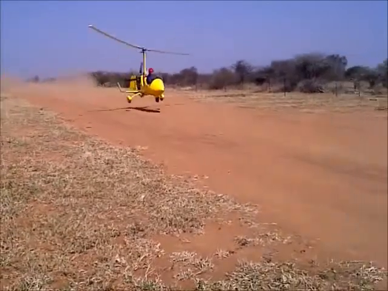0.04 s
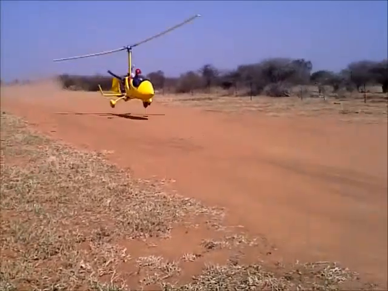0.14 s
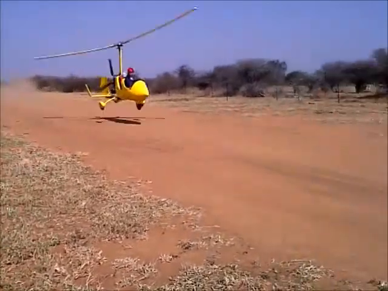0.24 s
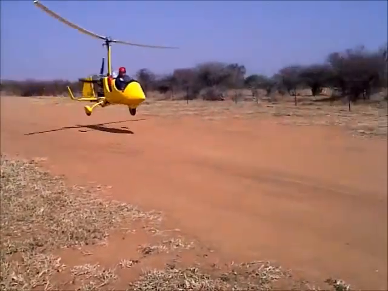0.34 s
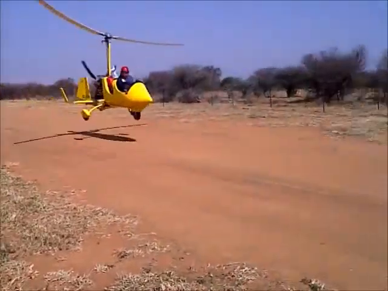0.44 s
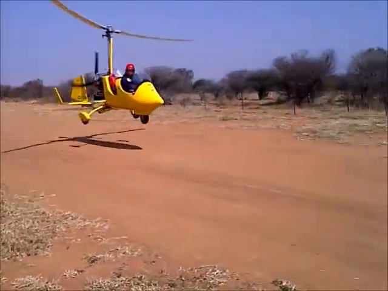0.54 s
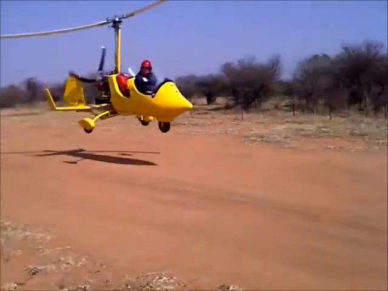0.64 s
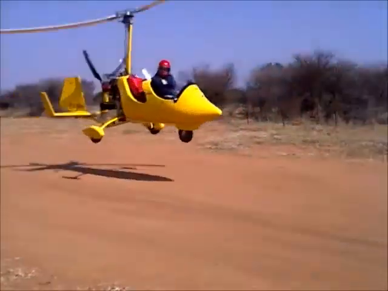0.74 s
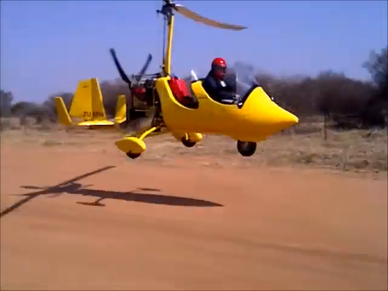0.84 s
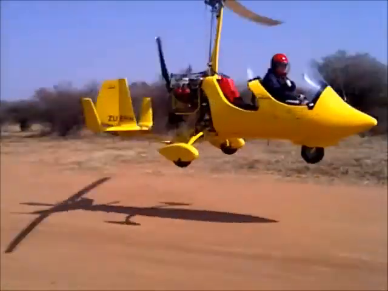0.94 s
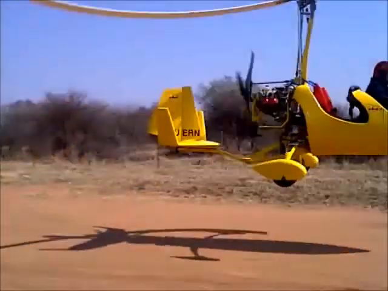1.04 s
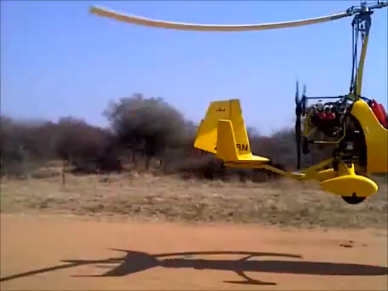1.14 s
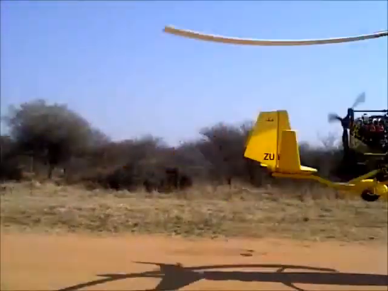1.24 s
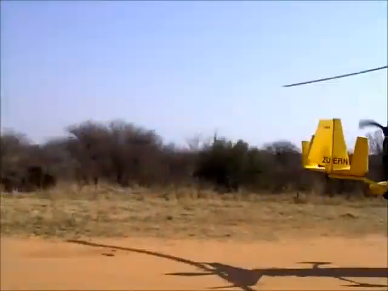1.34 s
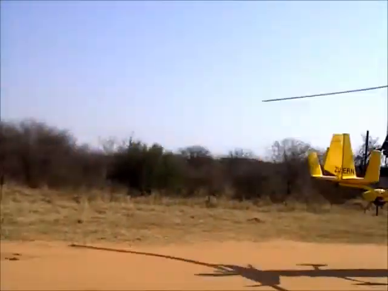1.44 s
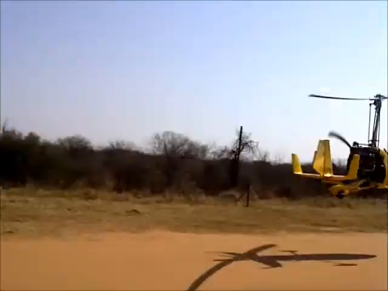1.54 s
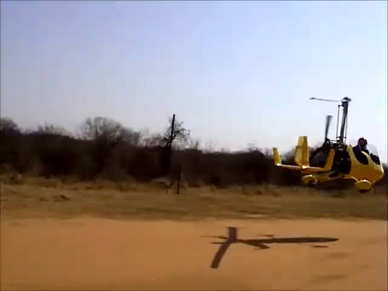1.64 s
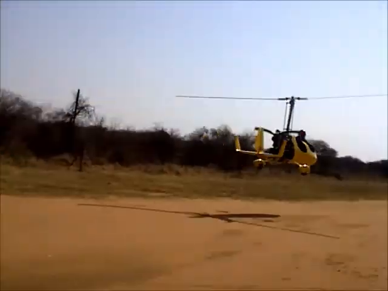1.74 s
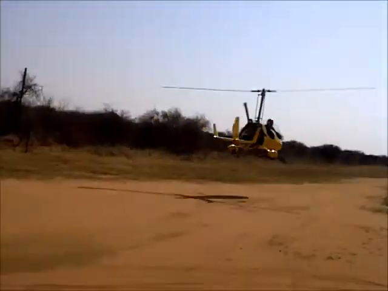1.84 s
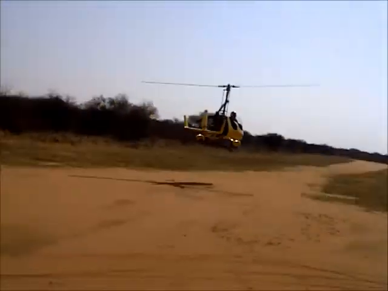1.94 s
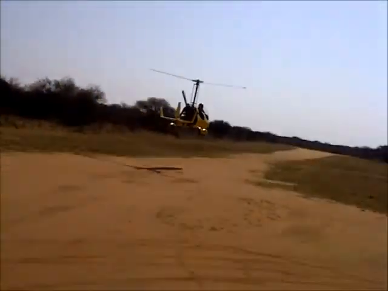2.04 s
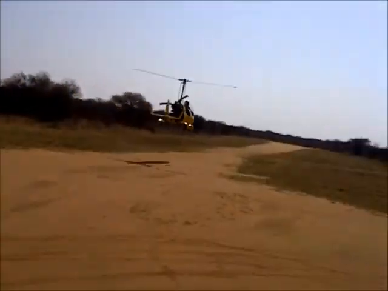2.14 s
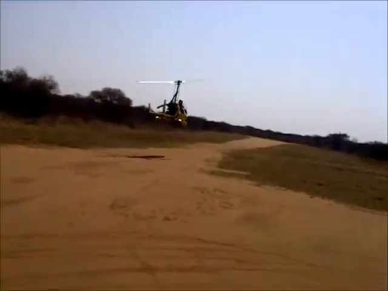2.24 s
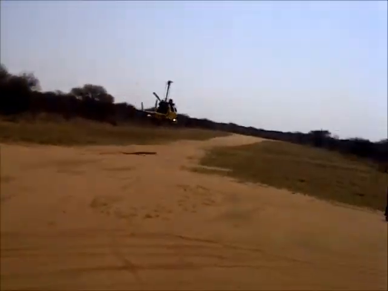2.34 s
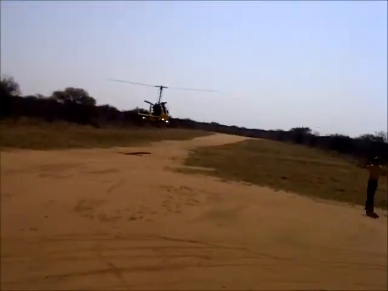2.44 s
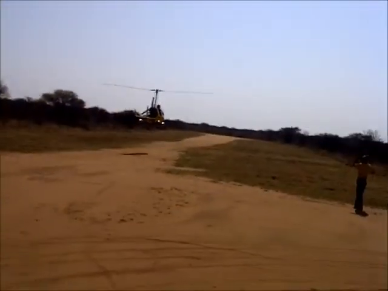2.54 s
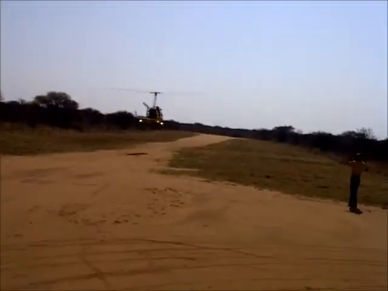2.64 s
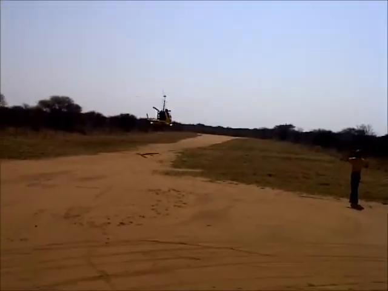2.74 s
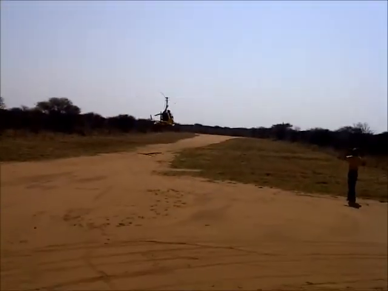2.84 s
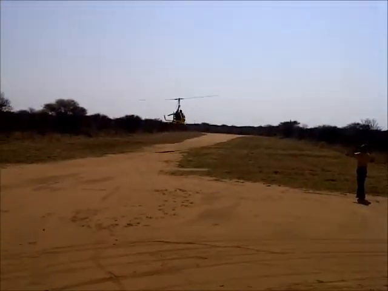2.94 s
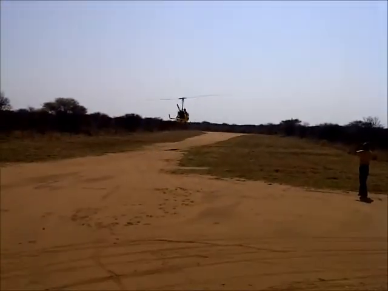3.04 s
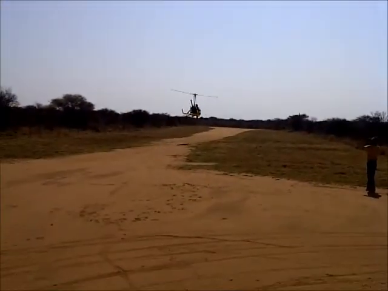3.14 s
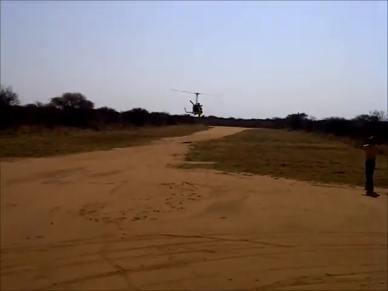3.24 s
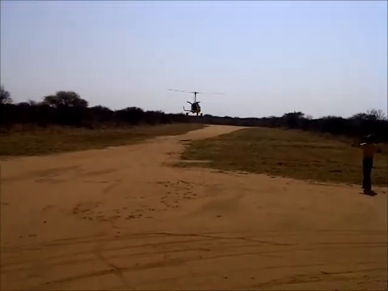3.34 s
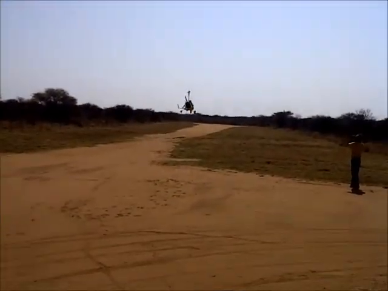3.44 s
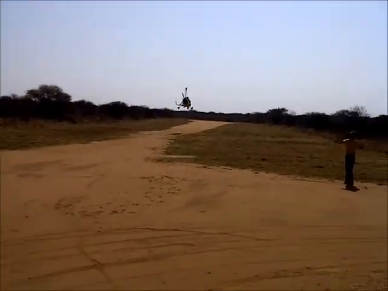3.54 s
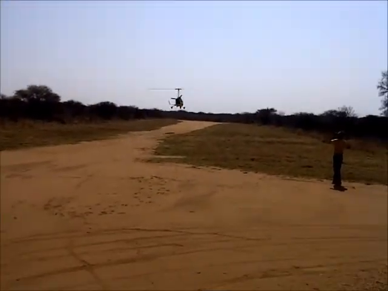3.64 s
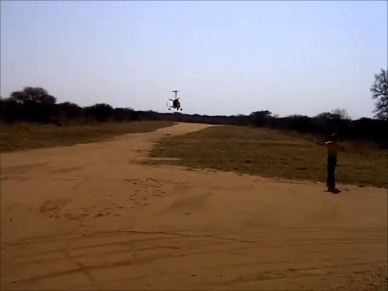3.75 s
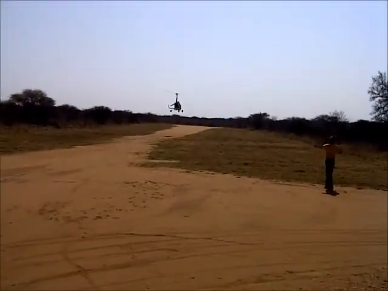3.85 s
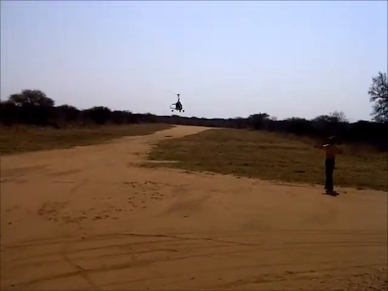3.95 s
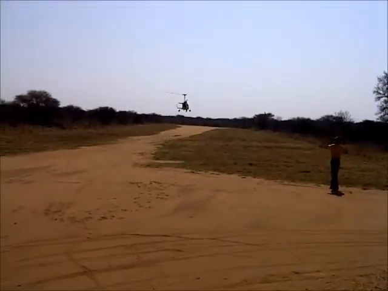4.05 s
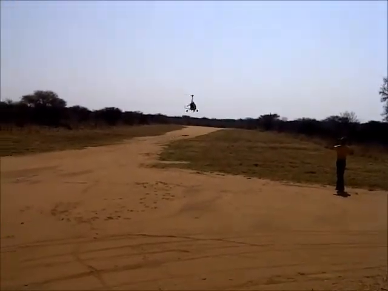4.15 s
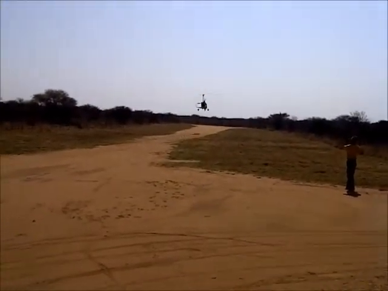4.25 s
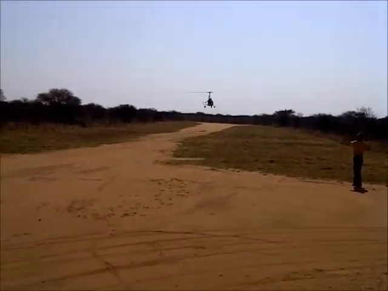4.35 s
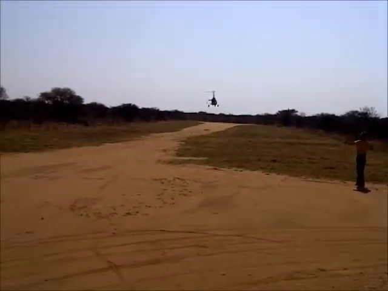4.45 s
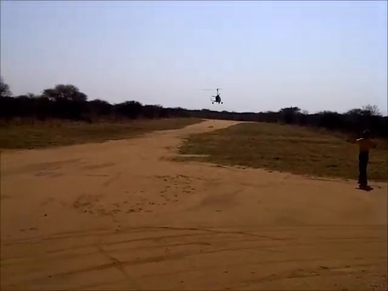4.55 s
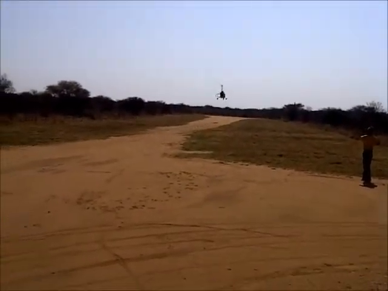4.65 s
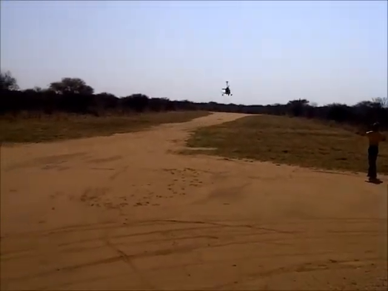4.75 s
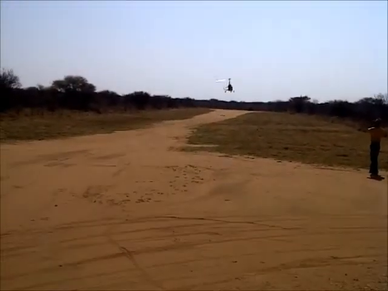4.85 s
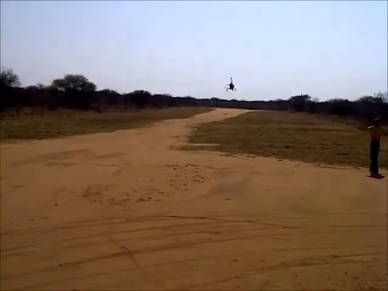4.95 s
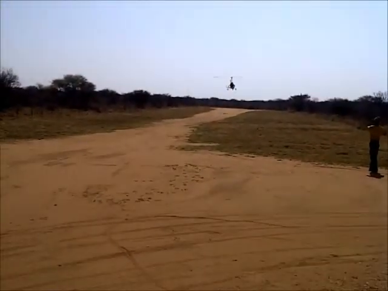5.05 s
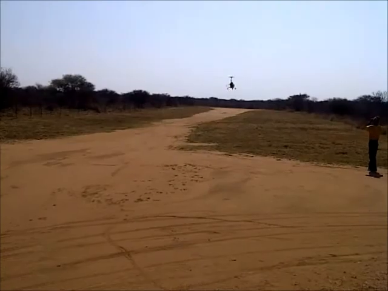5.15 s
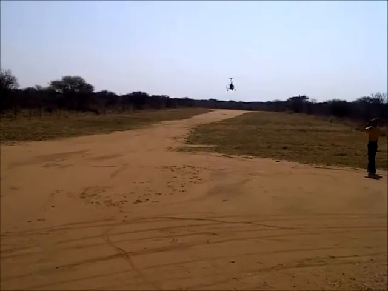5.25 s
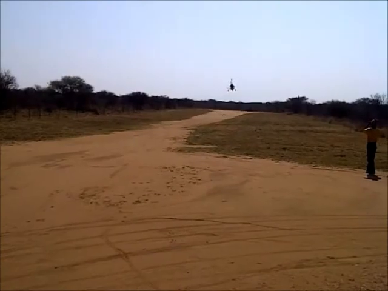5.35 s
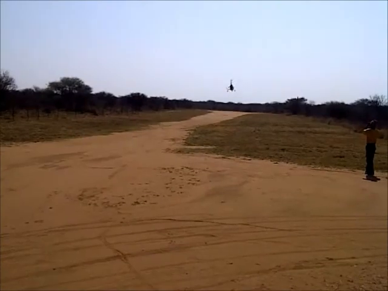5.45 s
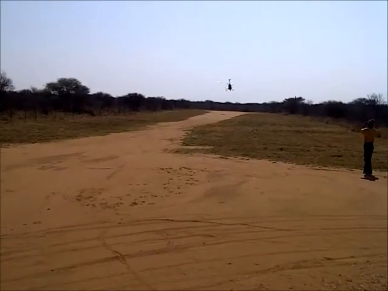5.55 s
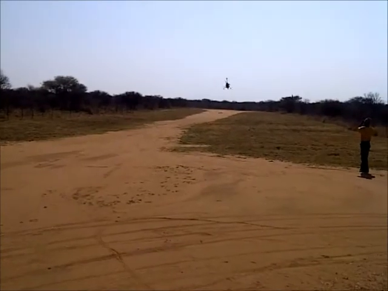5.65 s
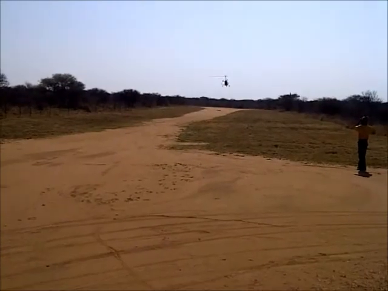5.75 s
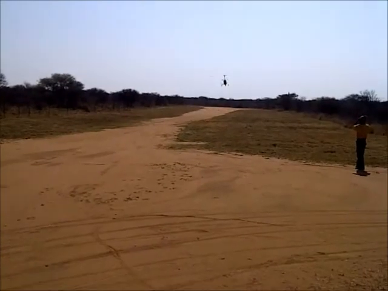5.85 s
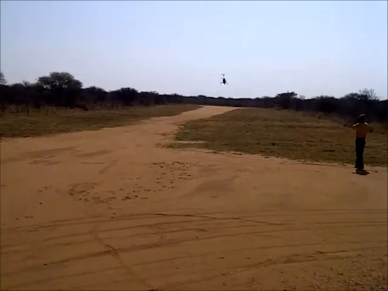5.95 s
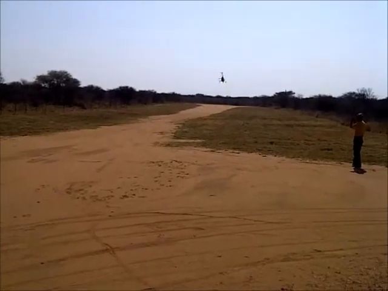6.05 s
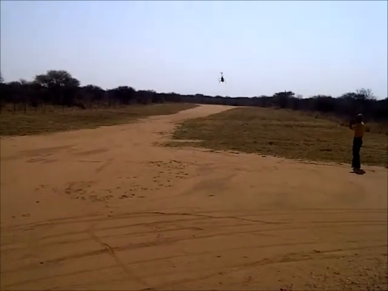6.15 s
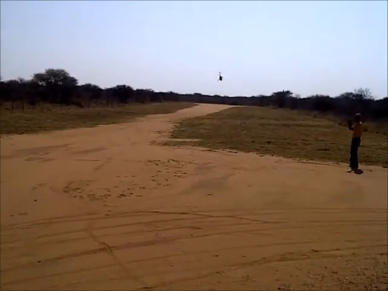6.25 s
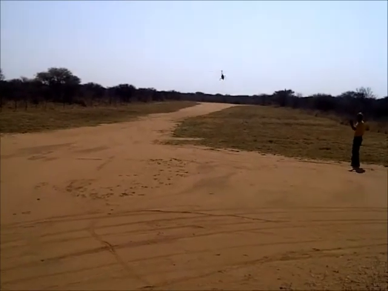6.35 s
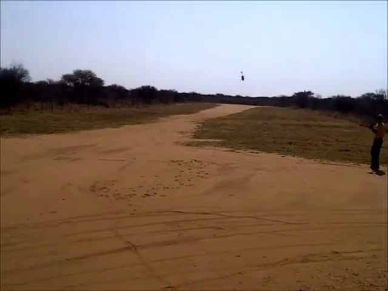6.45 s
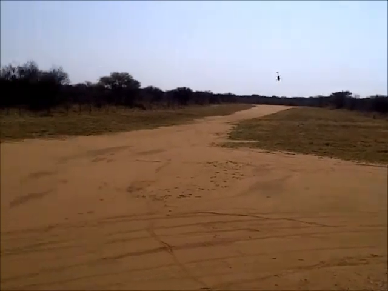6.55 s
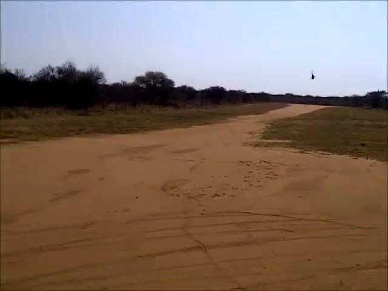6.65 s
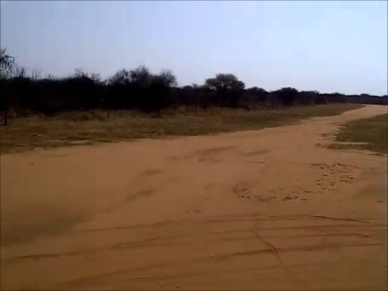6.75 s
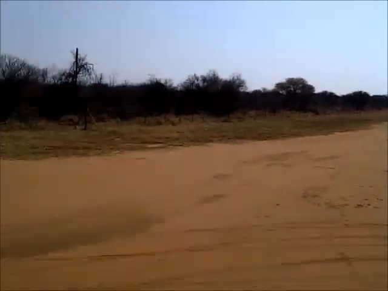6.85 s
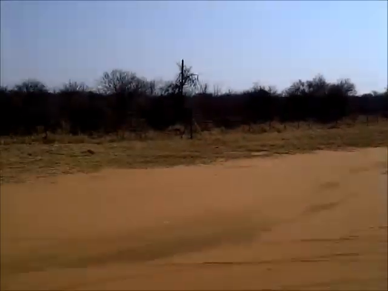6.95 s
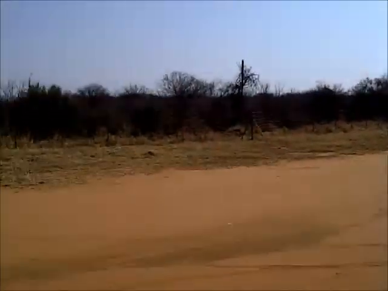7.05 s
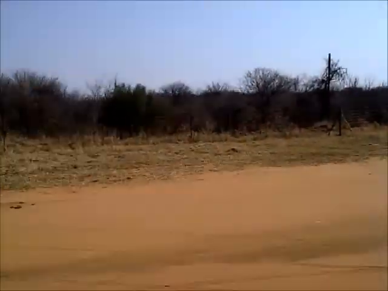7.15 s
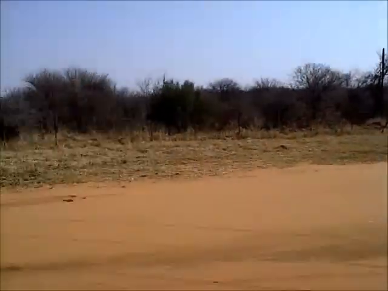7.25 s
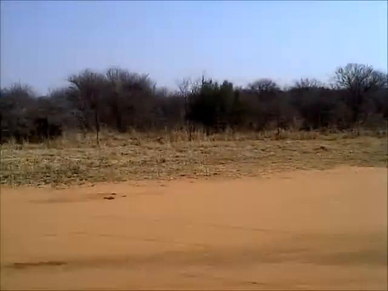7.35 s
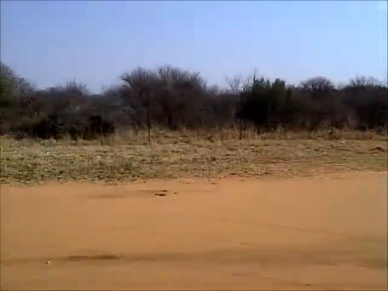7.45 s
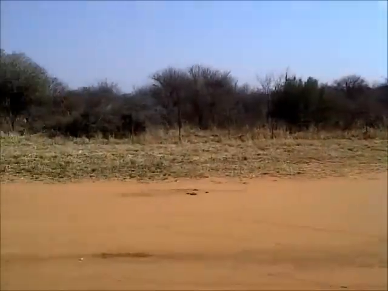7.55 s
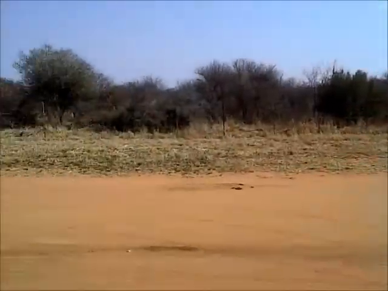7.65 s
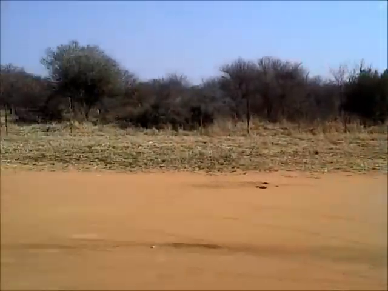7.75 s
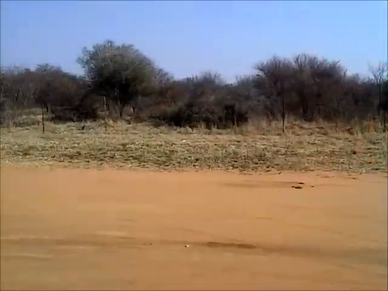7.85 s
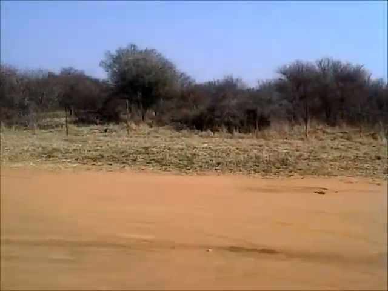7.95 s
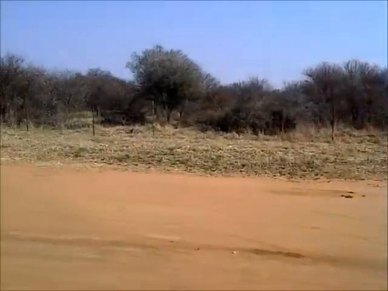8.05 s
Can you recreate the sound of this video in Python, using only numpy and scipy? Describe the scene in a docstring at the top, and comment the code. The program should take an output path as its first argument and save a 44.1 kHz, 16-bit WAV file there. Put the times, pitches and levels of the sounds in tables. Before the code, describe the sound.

A gyroplane approaches at full power along an open dirt airstrip, its propeller buzzing harshly over an engine drone, rushing air and a faint rotor swish. After about a second it passes close to the hand-held microphone, with a few quick rotor slaps and a clear drop in pitch. The drone eases slightly and grows fainter and duller as the craft climbs away. Light wind rumbles on the microphone.

```python
"""Gyroplane fly-by

A gyroplane at full power lifts off a dirt strip, passes close to a hand-held microphone and climbs away.
Its pusher propeller buzzes over the exhaust drone, the rotor swish and the roar of torn air.
The ground echoes it, the microphone's notches shift as it turns, and light wind rumbles on its port."""
import sys
import numpy as np
from scipy import signal
from scipy.fft import rfft, irfft
from scipy.io import wavfile
from scipy.ndimage import uniform_filter1d

SR = 44100
rng = np.random.default_rng(int(sys.argv[2]) if len(sys.argv) > 2 else 0)


def digitize_waveform(pressure):
    """Quantize a signal to 16-bit integers and store it at the path in sys.argv[1].

    Rows of a 2-D input are taken as channels; values are limited to [-1, 1].
    """
    field = np.atleast_2d(pressure).T
    bounded = np.clip(field, -1, 1)
    quanta = np.round(bounded * 32767).astype(np.int16)
    wavfile.write(sys.argv[1], SR, quanta)


N = 356769
TIME = np.arange(N) / SR
HOP, SIZE = 256, 1024  # short-time spectra, in samples
SPEED_M_S, PASS_S, NEAREST_M, SOUND_M_S = 25.27, 1.2575, 9.3, 343  # a straight flight past the listener


def gain_of(db):
    """Decibels to gain."""
    return 10 ** (np.asarray(db) / 20)


def unit_rms(x):
    """Scales to rms 1."""
    return x / np.sqrt(np.mean(x ** 2) + 1e-20)


def eq_curve(points, hz):
    """Joins EQ points on a log-frequency axis."""
    point_hz, db = np.transpose(points)
    return np.interp(np.log(hz + 1), np.log(point_hz + 1), db)


def bell(x, centre, width):
    """Bell curve of height 1; the width is two standard deviations."""
    return np.exp(-2 * ((x - centre) / width) ** 2)


def automation(rows, t):
    """One curve over the times t for each column after a table's time column."""
    times, *columns = np.transpose(rows)
    return [np.interp(t, times, column) for column in columns]


def wander(seconds):
    """Smooth random motion of rms 1 that changes over the given time."""
    x = rng.standard_normal(N // 64 + 2)
    for _ in range(2):
        x = uniform_filter1d(x, max(round(seconds * SR / 64), 1))
    return np.interp(np.arange(N) / 64, np.arange(len(x)), unit_rms(x))


def grid():
    """Frequencies and times of the short-time spectra."""
    return np.fft.rfftfreq(SIZE, 1 / SR)[:, None], np.arange(-(-N // HOP) + 1) * HOP / SR


def apply_eq(x, db):
    """Moving EQ, given in dB over frequency and frame; folding the cepstrum makes it causal."""
    spectra = signal.stft(x, nperseg=SIZE, noverlap=SIZE - HOP)[2]
    log_gain = np.maximum(db, -120) * np.ones(spectra.shape) * np.log(10) / 20
    cepstrum = irfft(log_gain, axis=0)
    cepstrum[1:SIZE // 2] *= 2
    cepstrum[SIZE // 2 + 1:] = 0
    response = np.exp(rfft(cepstrum, axis=0))
    return signal.istft(spectra * response, nperseg=SIZE, noverlap=SIZE - HOP)[1][:N]


def white_noise():
    """White noise of 0 dB per Hz."""
    return rng.standard_normal(N) * np.sqrt(SR / 2)


def wind():
    """Gusts buffet the microphone port with lumpy low noise and a few single puffs."""
    # The wind's dark tone. Each row: frequency in Hz, relative level in dB.
    colour = [(15, -24.5), (30, -11), (55, -6), (90, -3.5), (130, -3), (200, -23), (400, -58)]
    # Swells above the calm. Each row: peak time in seconds, level in dB, half-width in seconds.
    gusts = [(0, -50, .05), (.36, -47, .08), (.67, -46.5, .08), (1.3, -43.5, .3), (2.0, -50.5, .3),
             (2.6, -48, 0.089), (2.95, -47, .12), (3.398, -48, .06), (4.804, -47, .1), (5.3, -48.5, .2),
             (6.0, -49, .4), (5.65, -51, .2), (6.5, -52, 0.087), (7.52, -53, 0.045), (8.07, -54, .03)]
    # Puffs on the port. Each row: time in seconds, level in dB.
    puffs = [(1.254, -25.5), (1.367, -29), (6.919, -44), (7.531, -50)]
    calm_db = -57
    low_noise = unit_rms(apply_eq(white_noise(), eq_curve(colour, grid()[0])))
    level = gain_of(calm_db) + sum(gain_of(db) * bell(TIME, at, 2 * half) for at, db, half in gusts)
    out = low_noise * level * gain_of(2.5 * np.clip(wander(0.031), -2, 2))
    for at, db in puffs:
        swing = np.clip((TIME - at) / .004, -9, 9)
        out -= gain_of(db) * swing * np.exp(-swing ** 2 / 2)  # one push and pull of pressure
    return out


def handling_ticks():
    """Faint, bright grains of noise as the microphone is turned."""
    # Each row: start in seconds, peak level in dB.
    ticks = [(6.8299, -49), (7.0, -40), (7.1502, -40), (7.3984, -49), (7.7258, -55)]
    out = np.zeros(N)
    band = signal.butter(5, [2700, 4500], "bandpass", fs=SR, output="sos")
    envelope = signal.windows.exponential(500, center=40, tau=90, sym=False)
    for start, db in ticks:
        grain = signal.sosfilt(band, rng.standard_normal(500) * envelope)
        out[round(start * SR):][:500] += gain_of(db) * grain / abs(grain).max()
    return out


def whistles():
    """Short, thin falling tones with a rough edge."""
    # Each row: start in seconds, first and last pitch in Hz, length in seconds, level in dB.
    glides = [(1.169, 3950, 3770, 0.115, -35.5), (1.454, 3760, 3730, 0.1, -34), (6.8, 4500, 4300, .03, -66),
              (6.967, 4500, 4350, .03, -71.5), (7.316, 4150, 3950, 0.051, -55),
              (7.463, 5000, 4200, .04, -62), (7.823, 4200, 4000, 0.061, -58)]
    out = np.zeros(N)
    for start, start_hz, end_hz, length, db in glides:
        hz = np.linspace(start_hz, end_hz, round(length * SR))
        rough = 1 + 0.29 * unit_rms(uniform_filter1d(rng.standard_normal(len(hz)), 150))
        tone = np.sin(2 * np.pi * np.cumsum(hz) / SR)
        out[round(start * SR):][:len(hz)] += gain_of(db) * np.hanning(len(hz)) * rough * tone
    return out


def flight_position(t):
    """Metres the craft has flown past the nearest point, and its distance in metres."""
    past = SPEED_M_S * (t - PASS_S)
    return past, np.hypot(past, NEAREST_M)


def ground_echo_db():
    """The bounce off the ground combs the sound; rough soil scatters the echo's treble."""
    # The reflection. Each row: time in seconds, delay in milliseconds, strength from 0 to 1.
    bounce = [(0, 1.25, 0.74), (.6, 1.414, 0.48), (.95, 1.4, 0.82), (1.2, 1.83, 0.1), (1.4, 2.18, 0.43),
              (1.65, 1.51, 0.68), (2.2, 1.39, 0.86), (2.6, 1.28, 0.73), (3.05, 0.77, 0.2), (3.5, 1.1, 0),
              (4, 1.55, 0.5), (5.2, 1.45, .75), (8.09, 1.63, 0.75)]
    hz, t = grid()
    delay_ms, strength = automation(bounce, t)
    start_hz, end_hz, sink_s = 4020, 900, 0.94
    cutoff_hz = end_hz + (start_hz - end_hz) * np.exp(-t / sink_s)
    echo = strength * np.exp(-(hz / cutoff_hz) ** 2)
    lag_turns = hz * delay_ms / 1000 - 0.15  # soft ground turns the echo's phase
    comb = 1 + echo * np.exp(-2j * np.pi * lag_turns)
    return 20 * np.log10(abs(comb)) - 10 * np.log10(1 + echo ** 2)


def air_and_microphone_db():
    """Air dulls the distant craft, and the microphone's notches slide as the source moves off axis."""
    # The microphone's aim. Each row: time in seconds, frequency factor, notch depth from 0 to 1,
    # extra treble loss in dB per kHz.
    aim = [(0, 0.84, 0.53, .5), (.6, 1.09, 0.15, 0), (.95, 1.04, 0.6, 0.5), (1.3, 0.936, 0.4, -0.04),
           (1.6, 1.46, 0, 1.4), (2.0, 1.08, 1, 1.8), (2.6, 1.02, 0.62, 0.2), (6.5, 1, 0.8, 0.03),
           (6.9, 1.1, 0, -0.5), (7.3, 1.21, 0.5, -1.7), (8.09, 1.38, 0.7, -2)]
    # Its notches on axis. Each row: centre in Hz, width in Hz, gain at full depth in dB.
    notches = [(1450, 250, -7.5), (2034, 180, -13.5), (2540, 170, -3.5), (3430, 640, -5.5), (4100, 250, 0),
               (5200, 370, -0.5), (6230, 300, -4.5), (6500, 250, -5.5)]
    # Its port's tone on axis. Each row: frequency in Hz, gain in dB.
    port = [(3000, -1), (3400, 0.5), (3560, -4), (4800, -1), (5600, -4)]
    hz, t = grid()
    shift, depth, off_axis_loss = automation(aim, t)
    notch_db = sum(db * depth * bell(hz, centre * shift, width * shift) for centre, width, db in notches)
    distance = flight_position(t)[1]
    loss_db_per_khz = 0.67 + .02 * distance + off_axis_loss
    return notch_db + eq_curve(port, hz / shift) - loss_db_per_khz * (hz - 900) / 1000  # pivots at 900 Hz


def gliding_bands_db():
    """Bands that stand out or sink for a while as they glide."""
    # Each row: start and end in seconds, first and last centre in Hz, width in Hz, gain in dB.
    bands = [(-0.6, 1.01, 853, 850, 95, 8.5), (-0.24, 0.93, 1440, 1430, 210, 5.5),
             (.5, 1.12, 1000, 940, 110, 8), (1.37, 1.34, 750, 890, 90, 7), (1.0, 1.77, 430, 425, 80, 9),
             (1.17, 1.74, 980, 1160, 210, 6.5), (1.6, 2.3, 2550, 2170, 430, 5.5),
             (1.5, 6.1, 3250, 3150, 340, 5.5), (3.5, 6.5, 690, 700, 34, 4.5),
             (0.9, 2.72, 520, 1280, 280, 5.5), (2, 4.4, 425, 350, 60, 6.5), (5.0, 8.2, 400, 390, 224, -9.5),
             (7, 8.34, 900, 1760, 330, 7), (7.5, 8.9, 1900, 2700, 530, -10.5),
             (6.5, 8.7, 4300, 5300, 1130, 14.5)]
    hz, t = grid()
    out = 0
    for start, end, start_hz, end_hz, width, db in bands:
        progress = np.clip((t - start) / (end - start), 0, 1)
        fade = np.minimum(1.6 * np.sin(np.pi * progress), 1)
        out += db * fade * bell(hz, start_hz + progress * (end_hz - start_hz), width)
    return out


def flicker_db(rms_db, bins, frames):
    """Random swells in small patches of time and frequency."""
    hz, t = grid()
    field = rng.standard_normal((len(hz), len(t)))
    return rms_db * unit_rms(uniform_filter1d(uniform_filter1d(field, bins, 0), frames, 1))


def rumble(tone_db):
    """A bed of low noise that follows the level of a blade tone."""
    # The rumble's tone. Each row: frequency in Hz, gain in dB.
    colour = [(60, -38.5), (120, -24.5), (200, -19.5), (260, -8), (330, -24), (420, -20.5), (600, -69)]
    level = gain_of(tone_db - 19 + 0.5 * wander(0.014))
    return apply_eq(white_noise() * level, eq_curve(colour, grid()[0]))


def rotor_swish(blade_phase):
    """A short high swish from each tip of the two-blade rotor, one blade louder."""
    # The swish's fader. Each row: time in seconds, level before the EQ in dB per Hz.
    fader = [(0, -82), (.5, -76.5), (.9, -83.5), (1.3, -90), (2.5, -95), (5, -118)]
    # Its airy tone. Each row: frequency in Hz, gain in dB.
    colour = [(3000, -31), (5000, -9.5), (6000, -7.5), (6800, 1.5), (7600, -11.5)]
    passes_per_propeller_blade = .1065
    angle = 2 * np.pi * (passes_per_propeller_blade * blade_phase + .535)
    swish = np.exp(4.3 * (np.cos(angle) - 1))
    accent_db = 2.0 * np.cos(angle / 2) + 2.5 * wander(0.046)
    level = gain_of(automation(fader, TIME)[0] + accent_db)
    return apply_eq(swish * level * white_noise(), eq_curve(colour, grid()[0]))


def air_roar(blade_phase, level_db, eq_db):
    """Torn air, beating with the propeller blades and slapped by the rotor as it passes."""
    # Rotor slaps overhead. Each row: time in seconds, level on the roar's scale in dB,
    # half-width in seconds.
    slaps = [(1.047, -47.5, .012), (1.104, -38.5, 0.0093), (1.172, -42.5, 0.013), (1.514, -53, 0.0046)]
    # The roar's tone. Each row: frequency in Hz, gain in dB.
    colour = [(40, -45), (100, -26.5), (250, -25), (500, -13.5), (900, -14), (1500, -11), (2200, -15),
              (3200, -20.5), (4700, -31), (5600, -33), (6600, -32), (7500, -51)]
    depth = 0.22
    beat = np.exp(depth * np.cos(2 * np.pi * (blade_phase - .15))) / np.sqrt(np.i0(2 * depth))  # rms 1
    level = gain_of(level_db + 0.88 * wander(.012) + .5 * wander(0.01)) * beat
    level += sum(gain_of(db) * bell(TIME, at, 2 * half) for at, db, half in slaps)
    tone_db = eq_curve(colour, grid()[0]) + eq_db
    return apply_eq(level * white_noise(), tone_db + flicker_db(0.91, bins=14, frames=4))


def exhaust_drone(blade_phase, level_db):
    """The engine's firing tone, with weaker side tones from uneven cylinders."""
    # Each row: multiple of the firing rate, level against the firing tone in dB.
    side_tones = [(.5, -22), (.75, -16), (1.5, -18), (1.75, -17), (2.0, -17), (2.25, -18), (2.75, -21)]
    firings_per_blade = 1.62
    firing_phase = firings_per_blade * blade_phase
    out = gain_of(level_db + 0.73 * wander(0.027)) * np.cos(2 * np.pi * firing_phase)
    for multiple, db in side_tones:
        level = gain_of(level_db + db + 2.0 * wander(0.13))
        out += level * np.cos(2 * np.pi * (multiple * firing_phase + rng.random()))
    return np.sqrt(2) * out


def propeller_hum(blade_phase, first_db, second_db, third_db):
    """The three lowest blade tones; eddies in the air make them shimmer a little."""
    harmonics = [(1, first_db, 0.15, 0.98), (2, second_db, .02, 0.71), (3, third_db, 0.013, 1.5)]
    out = 0
    for k, db, lag, shimmer_db in harmonics:
        out += gain_of(db + shimmer_db * wander(0.019)) * np.cos(2 * np.pi * (k * blade_phase - lag))
    return np.sqrt(2) * out


def propeller_buzz(blade_phase, level_db, eq_db):
    """One sharp pulse per blade; eddies shake each overtone in size and phase, more over a long way."""
    # Each pulse chirps upward until the craft has passed.
    # Each row: time in seconds, lag in cycles per harmonic number squared.
    chirp_curve = [(1.5, 0.00913), (2.0, 0.00085)]
    # Far pulses smear, then sharpen at the end. Each row: time in seconds, full phase drift in cycles.
    blur_curve = [(6.8, .16), (7.3, .07)]
    # The buzz's tone. Each row: frequency in Hz, gain in dB.
    colour = [(300, -9.5), (400, -12), (600, -13.5), (900, -10.5), (1300, -11), (1800, -14.5), (2500, -22),
              (3500, -28), (5000, -60)]
    far = np.clip((-21.5 - level_db) / 13, 0, 1)  # faintness stands in for distance
    jitter = (0.0032 + 0.0084 * far) * wander(.012)
    chirp = automation(chirp_curve, TIME)[0]
    blur = automation(blur_curve, TIME)[0]
    pulses = np.zeros(N)
    for k in range(4, 40):
        capped = min(k, 12)  # the chirp ends at this harmonic
        lag = chirp * capped * (2 * k - capped)
        drift = .025 * wander(.04) + blur * far * wander(.4)
        shimmer_db = (.9 + 1.5 * far) * wander(0.02)
        fading_db = far * (1.9 * wander(0.36) - 0.18 * max(k - 8, 0))
        phase = k * (blade_phase + jitter) - lag + drift
        pulses += gain_of(shimmer_db + fading_db) * np.cos(2 * np.pi * phase)
    bite_db = (1.1 + .5 * far) * wander(.007)  # each blade cuts uneven air
    buzz = np.sqrt(2) * gain_of(level_db + bite_db) * pulses
    return apply_eq(buzz, eq_curve(colour, grid()[0]) + eq_db)


def scene():
    """The gyroplane drops in pitch as it passes and fades with distance, over light wind."""
    # How loud each layer sounds at the listener, before the fade with distance. Each row: time in
    # seconds, then faders in dB for blade tones one, two and three, the firing tone, buzz and roar.
    faders = [(0, -35, -15.5, -33, -45, -14, -37.5), (.2, -28.5, -15.5, -24, -39, -18.5, -39.5),
              (.6, -30, -15.5, -21.5, -34.5, -17.5, -40.5), (.82, -26.5, -16.5, -26, -31.5, -20, -38.5),
              (.95, -28, -19.5, -34.5, -30, -14.5, -35.5), (1.1, -17.5, -20, -23.5, -32, -16.5, -38),
              (1.22, -21.5, -24, -22.5, -35, -17, -42), (1.45, -21, -26.5, -26, -36, -18, -42),
              (1.6, -22.5, -22, -38, -29, -21, -40.5), (1.78, -24.5, -20, -27.5, -32, -18, -39.5),
              (2.0, -27, -15, -23.5, -27, -18.5, -40), (2.68, -28.5, -12, -24, -25, -20.5, -44),
              (2.93, -30, -14, -23, -29, -30, -46), (3.5, -31.5, -17.5, -27, -24, -29.5, -48),
              (4.25, -35.5, -23, -33, -25, -27, -48), (5.4, -36.5, -22.5, -32.5, -26.5, -25.5, -46),
              (6.7, -35, -21.5, -38.5, -28, -25.5, -47.5), (7.35, -34.5, -23, -47, -26.5, -28.5, -54),
              (8.09, -38.5, -24.5, -47, -29, -26.5, -50.5)]
    # The throttle eases after the pass. Each row: time in seconds, blade rate on board in Hz.
    blade_rate = [(0, 113.7), (.8, 114.15), (1.3, 113.9), (2, 114.3), (3.2, 113.3), (3.85, 107.9),
                  (4.4, 106.75), (5.1, 106.25), (6.05, 106.6), (8.09, 108.5)]
    past, distance = flight_position(TIME)
    hold_m = 37  # the level falls as 1 / distance only beyond this
    spread_db = -20 * np.log10(np.maximum(distance / hold_m, 1))
    first_db, second_db, third_db, firing_db, buzz_db, roar_db = automation(faders, TIME) + spread_db
    doppler_stretch = 1 + SPEED_M_S * past / distance / SOUND_M_S
    blade_phase = np.cumsum(automation(blade_rate, TIME)[0] / doppler_stretch) / SR  # in cycles
    path_db = ground_echo_db() + air_and_microphone_db()
    bands_db = gliding_bands_db()
    craft = propeller_hum(blade_phase, first_db, second_db, third_db)
    craft += exhaust_drone(blade_phase, firing_db)
    craft += rotor_swish(blade_phase)
    craft += propeller_buzz(blade_phase, buzz_db, path_db + bands_db)
    craft += air_roar(blade_phase, roar_db, path_db + 0.66 * bands_db)  # a wider source is less coloured
    craft += rumble(second_db)
    return (craft + whistles() + handling_ticks() + wind())[None]


def record(dry):
    """Soft overload, faint circuit hiss, a bass cut and a steep treble cut."""
    saturated = 0.88 * np.tanh(dry / 0.96) + gain_of(-91.0) * rng.standard_normal(dry.shape)
    bass_cut = signal.butter(2, 22, "highpass", fs=SR, output="sos")
    treble_cut = signal.firwin(401, cutoff=7650, window=("kaiser", 9), fs=SR)
    filtered = signal.oaconvolve(signal.sosfilt(bass_cut, saturated), treble_cut[None], "same")
    return filtered + gain_of(-102) * rng.standard_normal(dry.shape)


dry = scene()
out = record(dry)
digitize_waveform(out)
```